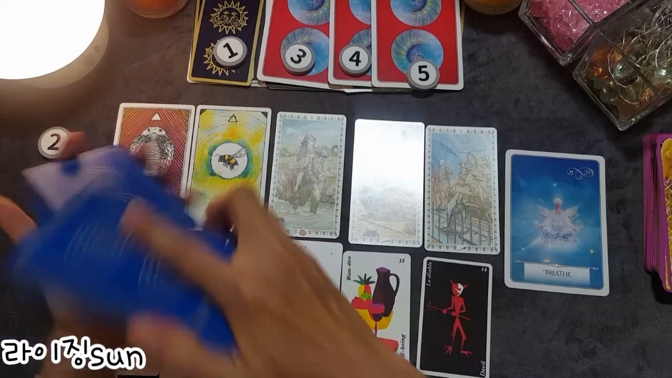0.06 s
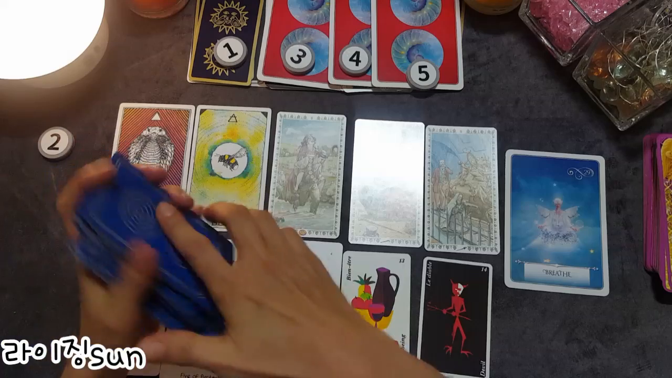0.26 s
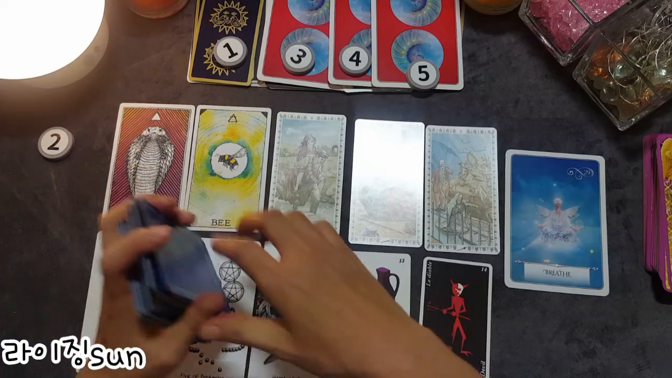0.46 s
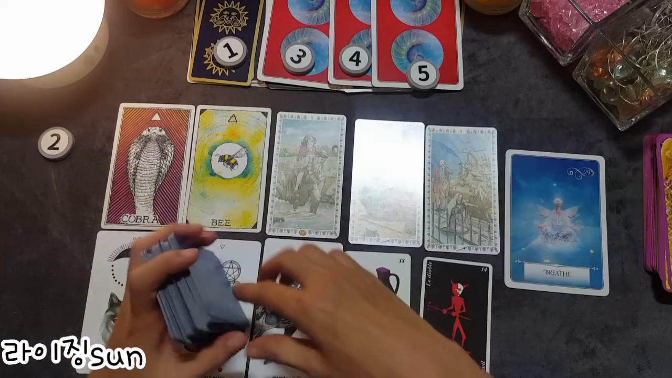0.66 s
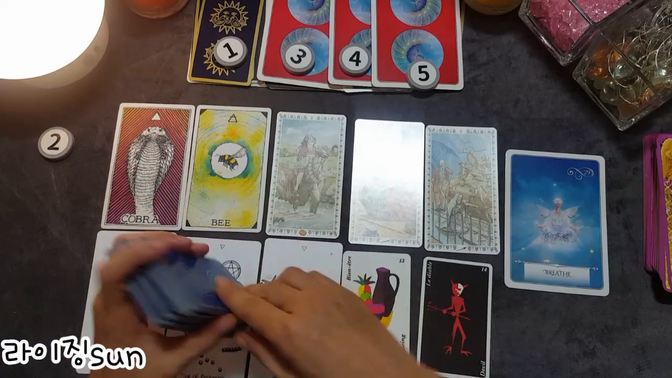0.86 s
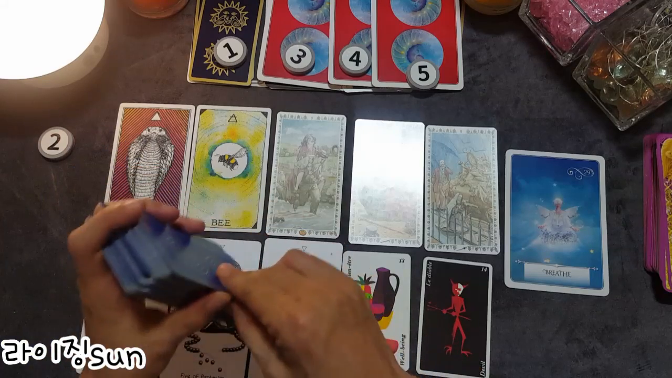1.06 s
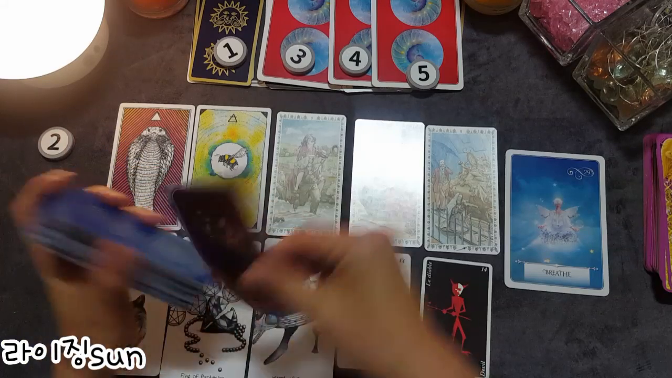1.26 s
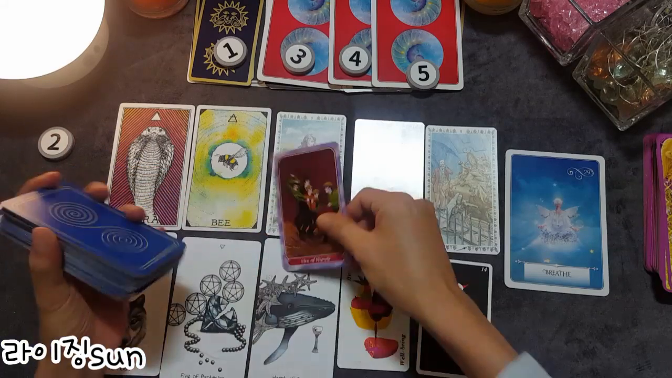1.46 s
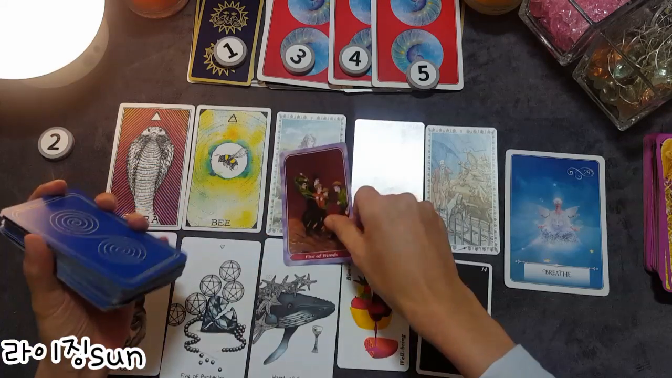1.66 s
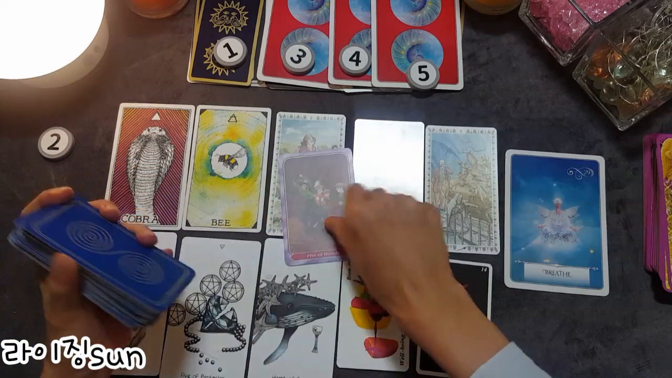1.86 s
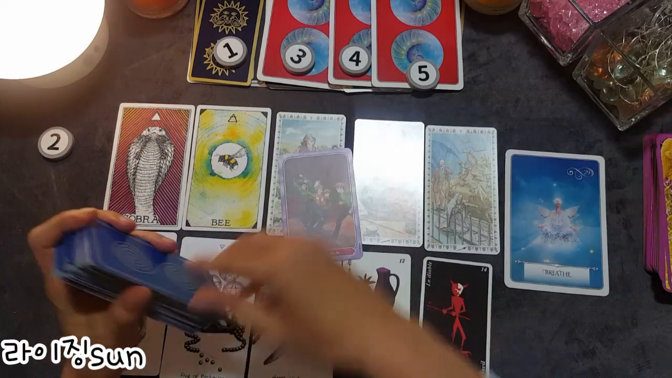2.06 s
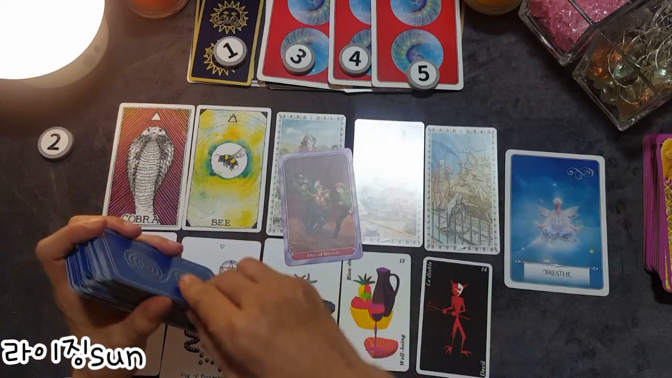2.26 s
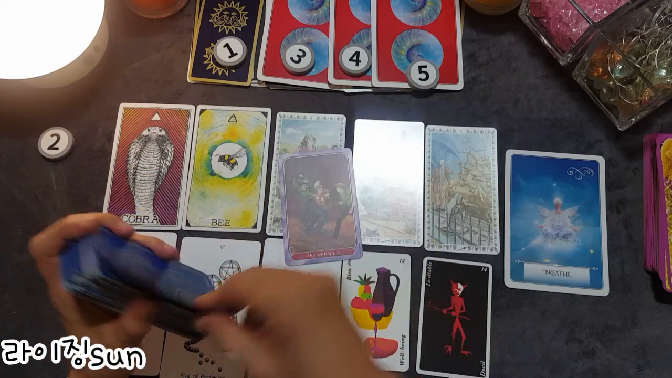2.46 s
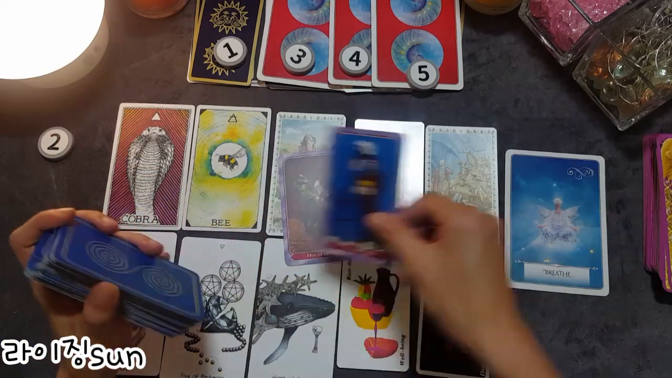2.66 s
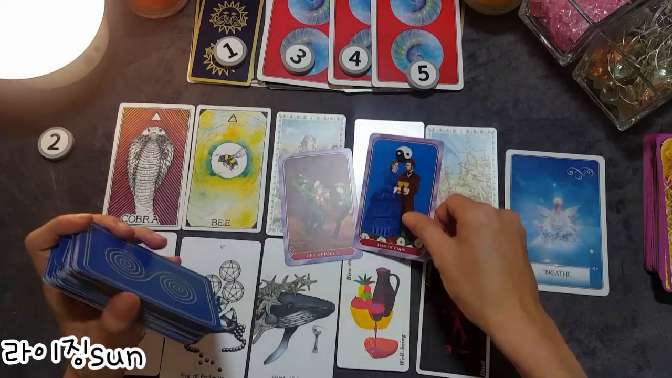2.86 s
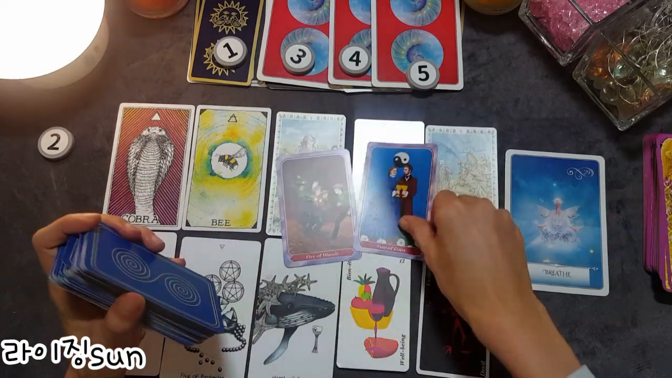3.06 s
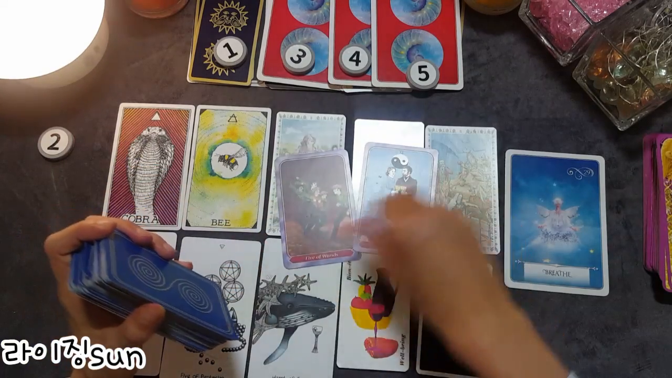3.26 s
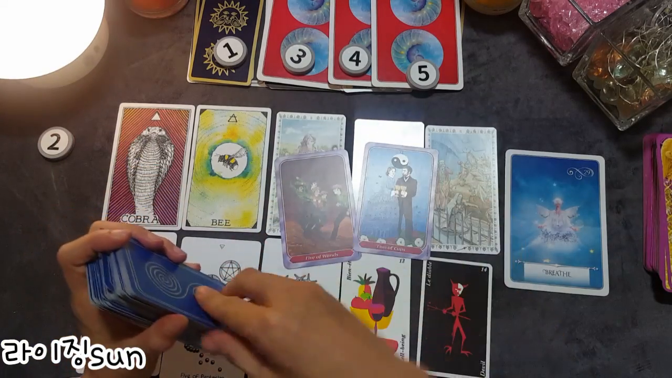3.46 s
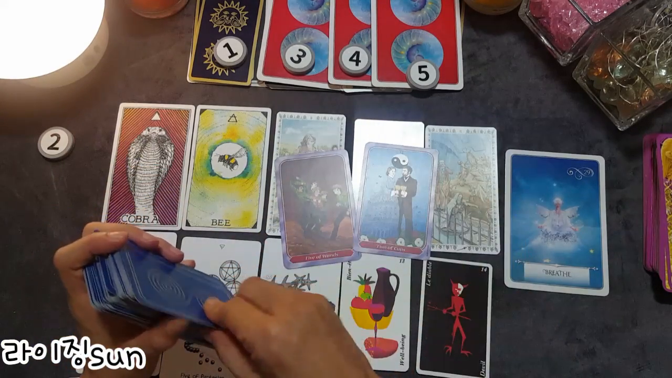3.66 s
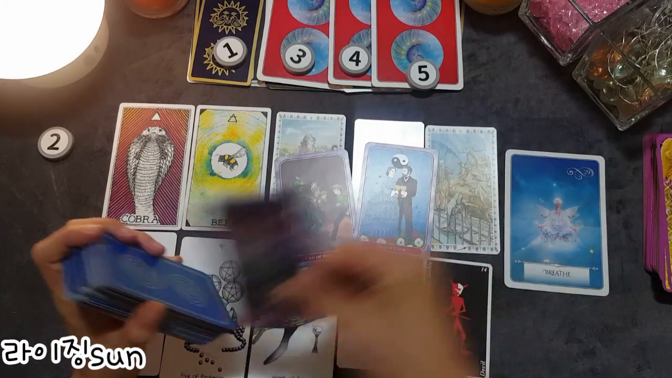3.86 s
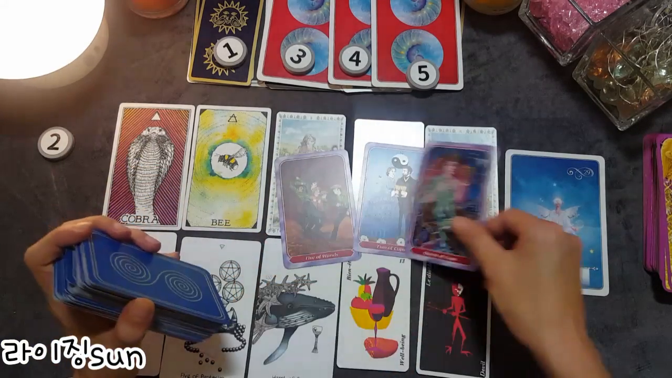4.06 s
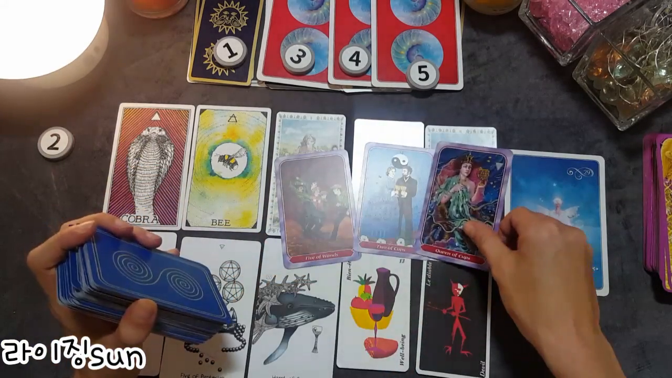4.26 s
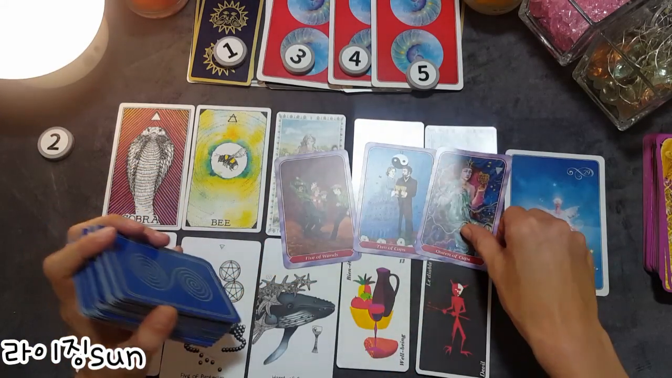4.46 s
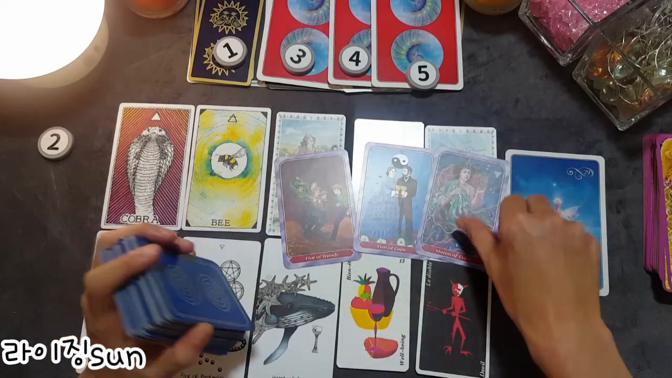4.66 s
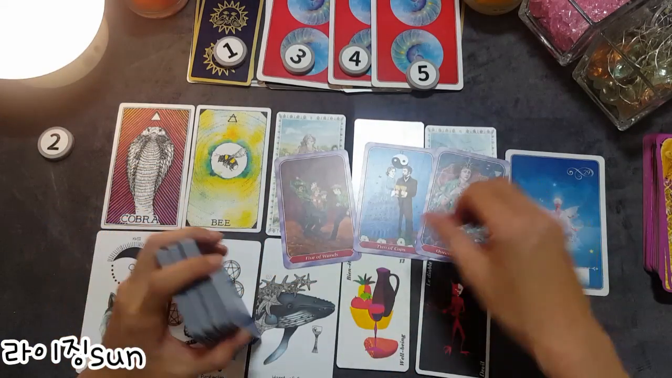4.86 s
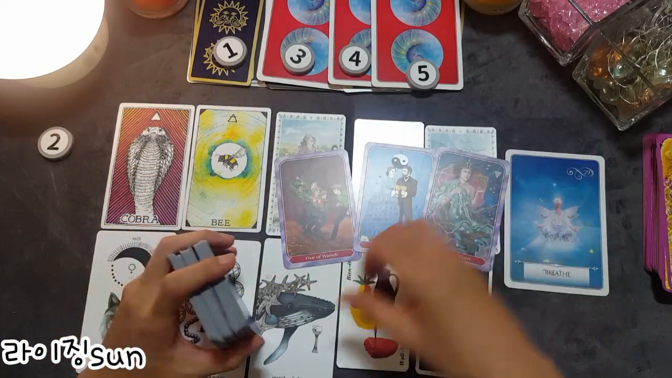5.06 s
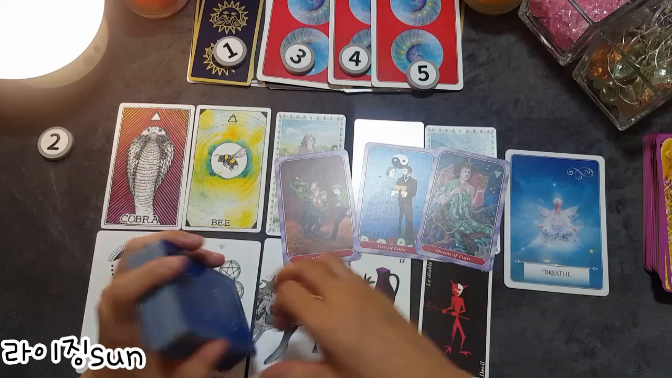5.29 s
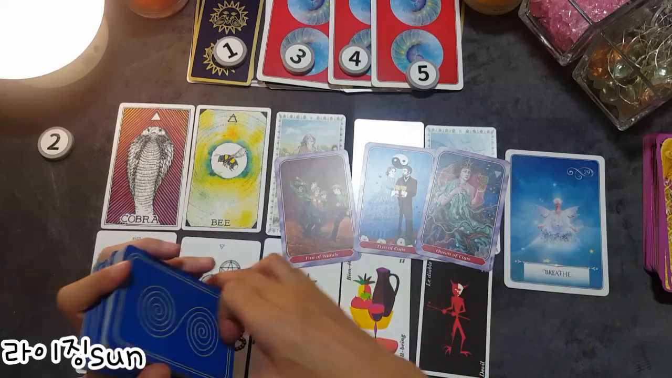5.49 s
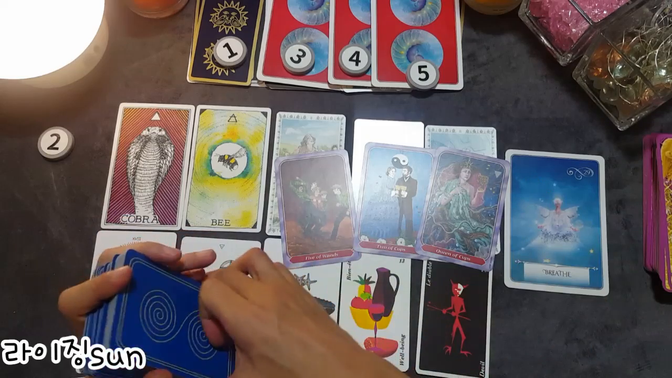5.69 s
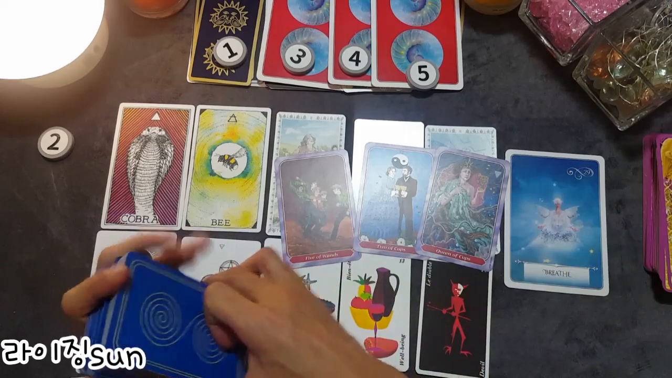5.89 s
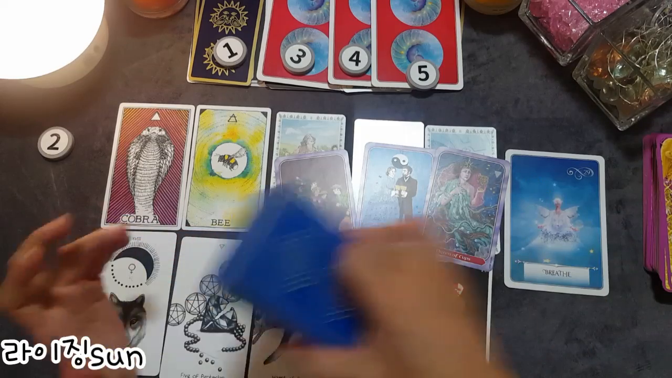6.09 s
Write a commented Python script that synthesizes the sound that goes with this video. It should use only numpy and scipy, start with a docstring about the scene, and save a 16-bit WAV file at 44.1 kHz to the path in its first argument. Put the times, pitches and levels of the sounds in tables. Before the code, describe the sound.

Close card handling: hissing slides, a sharp clap, a fluttering rush, three rasping draws each ending in a crisp snap, then more soft knocks.

```python
"""Close stereo of a card deck on a cloth-covered table in a small room, over air noise and a faint hum.
A card slides, then the stiff deck is clapped shut, knocked square, bounced, and settles in a rush of cards.
Three cards are drawn in turn, dragged over the thumb and snapped down; the deck is knocked again, a finger squeaks.
Ticks, taps and rustle run between. Contacts are shaped noise or impulses through resonances, rubbing is grainy
coloured noise; resonances of room and table ring after a push and the walls answer with a decaying noise tail."""
import sys
import numpy as np
from scipy import signal
from scipy.fft import rfft, irfft, next_fast_len
from scipy.io import wavfile
from scipy.ndimage import uniform_filter1d

SR = 44100
rng = np.random.default_rng(int(sys.argv[2]) if len(sys.argv) > 2 else 0)


def persist_wave(psi):
    """Save psi, clipped to +-1, as 16-bit WAV."""
    counts = np.round(np.clip(psi, -1, 1) * 32767).astype(np.int16)
    wavfile.write(sys.argv[1], SR, np.atleast_2d(counts).T)


N = 270333
TIME = np.arange(N) / SR

# left-right likeness of sound straight from the hands: f/Hz, likeness/0-1
NEAR_LIKENESS = [(500, 0.88), (1400, 0.69), (3000, 0), (6000, 0)]
# left-right likeness of the room's reflections and air noise: f/Hz, likeness/0-1
ROOM_LIKENESS = [(60, 0.92), (150, 0.92), (300, 0.72), (640, 0.38), (1400, 0), (4000, 0), (15000, 0)]
# colour of a card or skin rasping: f/Hz, level/dB
RASP_COLOUR = [(200, -17.5), (600, 0.5), (1100, 3.5), (2400, 2), (4500, -6), (7000, -4.5), (14000, -30)]
# dealt cards snapping down: t/s, level/dB, drag length/s, drag gain/dB, spread of the snap/s,
# card pitch f/Hz, card ring/dB, thud/dB
RELEASES = [(1.9138, -6.5, 0.055, -45, 0.0015, 4300, 5, -10.5),
            (3.2281, -3.5, 0.074, -44.5, 0.0027, 850, 8, -20.5),
            (4.6501, -5.5, .128, -42.5, 0.0038, 740, -9, -21)]


def from_db(db):
    """Decibels to gain."""
    return 10 ** (np.asarray(db) / 20)


def rms_one(x):
    """Scale to rms 1."""
    return x / np.sqrt(np.mean(x ** 2) + 1e-20)


def at_hz(points, hz):
    """Read a table on a log-frequency axis."""
    f, value = np.transpose(points)
    return np.interp(np.log(np.maximum(hz, 1)), np.log(f), value)


def cut(x, hz, kind, order=2):
    """Butterworth filter: keep what lies below or above a cut-off."""
    sos = signal.butter(order, np.clip(hz, 10, SR / 2 - 500), kind, fs=SR, output="sos")
    return signal.sosfilt(sos, x + 1e-18)


def resonate(x, hz, width):
    """One damped resonance, width in Hz, with a gain of about 1 at its peak."""
    r = np.exp(-np.pi * width / SR)
    feed = np.array([1, 0, -1]) * (1 - r * r) / 2
    return signal.lfilter(feed, [1, -2 * r * np.cos(2 * np.pi * hz / SR), r * r], x + 1e-18)


def colour(x, spectrum):
    """Give a noise a spectrum."""
    size = next_fast_len(x.shape[-1])
    gain = from_db(at_hz(spectrum, np.fft.rfftfreq(size, 1 / SR)))
    return irfft(rfft(x, size) * gain, size)[..., :x.shape[-1]]


def stereo_noise(size, likeness):
    """White noise whose left-right likeness follows a table over frequency; rms 1."""
    padded = next_fast_len(size)
    mid, side = rfft(rng.standard_normal((2, padded)))
    alike = np.clip(at_hz(likeness, np.fft.rfftfreq(padded, 1 / SR)), -1, 1)
    both = np.sqrt(1 + alike) * mid + np.sqrt(1 - alike) * np.array([side, -side])
    return rms_one(irfft(both, padded)[:, :size])


def drift(rate, size=N):
    """Random points of spread 1, rate of them per second, joined by straight lines."""
    knots = np.arange(0, size / SR + 1, 1 / rate)
    return np.interp(TIME[:size], knots, rng.standard_normal(len(knots)))


def add(out, s, sound, pan_db=0):
    """Mix a sound in at time s; pan_db is left over right."""
    start = max(round(s * SR), 0)
    placed = sound * from_db([[pan_db / 2], [-pan_db / 2]])
    out[:, start:start + sound.shape[-1]] += placed[..., :N - start]


def track(sounds):
    """Lay (s, level dB, L-R dB, sound) on one track, each sound centred on its time."""
    out = np.zeros((2, N))
    for s, level_db, pan_db, sound in sounds:
        add(out, s - sound.shape[-1] / SR / 2, from_db(level_db) * sound, pan_db)
    return out


def contact(swell, fade, grain_db, size=8192):
    """Tiny touches crowd, in clumps, toward mid-window and thin out after it; energy 1 a side."""
    t = (np.arange(size) - size // 2) / SR
    envelope = np.exp(-np.maximum(-t / max(swell, 1e-5), t / max(fade, 1e-5)))
    grains = from_db(grain_db * (rng.standard_normal(size) + .6 * drift(900, size)))
    spectrum = rfft(stereo_noise(size, NEAR_LIKENESS) * envelope * grains)
    # even out the burst's spectrum, so that every contact has a steady tone colour
    smooth_power = uniform_filter1d(np.abs(spectrum) ** 2, size=60)
    touches = irfft(spectrum / np.sqrt(smooth_power + 1e-12)) * envelope ** .15
    return touches / np.sqrt(np.sum(touches ** 2, axis=1, keepdims=True))


def snap(swell, fade, hz, ring_db, crack_db, treble_db, body_hz=4100, edge_hz=5300, top_hz=13500,
         card_q=2.04, low_hz=120, crack_hz=2900, crack_width=900):
    """A card slaps down: woody body, the card's short ring, the crack of stiff stock and a crisp top."""
    force = contact(swell, fade, grain_db=3.0)
    body = cut(cut(force, body_hz, "low", order=3), low_hz, "high", order=1)
    ring = from_db(ring_db) * resonate(resonate(body, hz, hz / card_q), hz, hz / card_q)
    crack = from_db(crack_db) * resonate(body, crack_hz, crack_width)
    edge = from_db(treble_db) * cut(cut(force, edge_hz, "high", order=4), top_hz, "low")
    return body + ring + crack + edge * from_db([[-1.2], [1.0]])  # left, right


def friction(spectrum, grain_db):
    """Card fibres catch and slip in fine grains, and the whole stroke judders; rms 1."""
    judder = from_db(2.7 * drift(300))
    slips = stereo_noise(N, NEAR_LIKENESS) * judder * from_db(grain_db * drift(4000))
    return rms_one(colour(slips, spectrum))


def stroke(start, end, rise_db_per_s, sag_db_per_s=0, stop_db_per_s=1995):
    """A gain that rises to 1 at the start, sags from then on and stops quickly after the end."""
    early, since, late = np.maximum([start - TIME, TIME - start, TIME - end], 0)
    loss_db = rise_db_per_s * early + sag_db_per_s * since + stop_db_per_s * late
    return from_db(-np.minimum(loss_db, 200))


def ring_modes(push):
    """Low and mid resonances of room and table ring after a push."""
    # resonances: f/Hz, width/Hz, level/dB
    resonances = [(148.6, 5.4, 15), (213.6, 7.6, 14.5), (227.9, 11, 20), (263, 14, -13), (377, 6.1, 16.5),
                  (485, 7.4, 10), (642.2, 7.4, 15), (953, 12, 11.5), (1153, 12, -7), (1350, 14.5, -8),
                  (1414, 6.9, 12.5), (1996, 10, 18.5), (2115, 15, 22)]
    return sum(from_db(db) * resonate(push, hz, width) for hz, width, db in resonances)


def background(waver=1.0, air_db=-62.21):
    """Steady air noise fills the room under faint appliance tones that waver in phase."""
    # colour of the air noise: f/Hz, level/dB
    air_colour = [(12, -40), (20, -23), (53, -12.5), (134, -1), (198, -9), (399, -10.5), (642, -16),
                  (718, -13.5), (976, -20.5), (1370, -21), (1810, -26.5), (2390, -27), (6720, -38),
                  (13900, -36), (16000, -34.5)]
    # appliance tones: f/Hz, level/dB
    hum_tones = [(54, -77.5), (119, -73), (258, -77), (13790, -90)]
    air = from_db(air_db) * rms_one(colour(stereo_noise(N, ROOM_LIKENESS), air_colour))
    hum = 0
    for hz, db in hum_tones:
        phase = 2 * np.pi * hz * TIME + waver * drift(8)
        hum = hum + from_db(db) * np.sqrt(2) * np.sin(phase)
    return air + hum


def rustle(level_db=-80, swing_db=5, swings_per_s=22):
    """Fingers shift on the deck all the while: skin rubs faintly, coming and going."""
    return from_db(level_db + swing_db * drift(swings_per_s)) * friction(RASP_COLOUR, grain_db=3.0)


def slides():
    """A card creeps under the finger, runs free with a hiss, slows, and flicks off the edge of the deck."""
    # cards running free over the deck: t/s, hiss/dB, slowing/(dB per s), time to the end flick/s, flick/dB
    slide_list = [(0.002, -52.5, 62, 0.022, -81), (0.84, -62, 103.5, 0.044, -71),
                  (1.309, -49, 70, 0.044, -61), (2.572, -47.5, 520, 0.0646, -53.5),
                  (3.892, -44, 500, 0.0635, -54), (5.27, -65.5, 700, 0.055, -76)]
    # colour of the hiss: f/Hz, level/dB
    hiss_colour = [(1500, -20), (5000, -8), (8500, -13.5), (11000, -4.5), (14000, -11), (16000, -8.5)]
    creep_s, creep_db, creep_rise_db_per_s = 0.2, -20.5, 56  # creep level is against the free run
    break_db_per_s, flick_db_per_s = 1400, 900  # how fast the run starts and the flick swells
    # the rasp builds after the hiss, as the card bends over the edge
    rasp_lag_s, rasp_rise_db_per_s, rasp_sag_db_per_s = 0.018, 330, 105
    rasp_creep_db, rasp_run_db = -18, -10  # against the peak hiss
    hiss, rasp = np.zeros((2, N))
    for s, hiss_db, slowing_db_per_s, run_s, flick_db in slide_list:
        end = s + run_s
        creep = stroke(s, s, creep_rise_db_per_s) * (TIME > s - creep_s)
        run = stroke(s, end, break_db_per_s, slowing_db_per_s)
        bend = stroke(s + rasp_lag_s, end, rasp_rise_db_per_s, rasp_sag_db_per_s)
        hiss += from_db(hiss_db) * (from_db(creep_db) * creep + run)
        hiss += from_db(flick_db) * stroke(end, end, flick_db_per_s)
        rasp += from_db(hiss_db) * np.maximum(from_db(rasp_creep_db) * creep, from_db(rasp_run_db) * bend)
    hissing = hiss * friction(hiss_colour, grain_db=2.0) * from_db([[-1.5], [0.3]])  # left, right
    return hissing + rasp * friction(RASP_COLOUR, grain_db=5.0)


def room(x, first_echo_s=0.00064, build_s=0.00047):
    """Dense reflections from near walls, each octave dying at its own rate."""
    # decay of the room: f/Hz, time to fall 60 dB/s
    decay_times = [(100, 0.9), (260, 0.35), (700, 0.33), (1400, 0.32), (2500, 0.33), (4850, 0.37),
                   (12800, 0.25)]
    # colour of the reflections: f/Hz, level/dB
    wall_colour = [(50, -7), (150, -6.5), (400, 1), (800, -1), (1400, -4), (2100, -2), (4000, -5.5),
                   (7000, -6), (11000, -4), (16000, -6)]
    t = TIME[:SR * 3 // 4]
    noise = rfft(colour(stereo_noise(len(t), ROOM_LIKENESS), wall_colour))
    hz = np.fft.rfftfreq(len(t), 1 / SR)
    centres, tail = np.geomspace(60, 15360, 9), 0
    for centre, share in zip(centres, np.eye(len(centres))):
        decay = from_db(-60 * t / at_hz(decay_times, centre))
        decay = decay * (1 - np.exp(-np.maximum(t - first_echo_s, 0) / build_s))
        octave = irfft(noise * at_hz(np.c_[centres, share], hz), len(t))
        tail = tail + octave * decay / np.linalg.norm(decay)
    return signal.fftconvolve(x, tail, axes=1)[:, :N]


def taps(tap_q=1.2, pad_hz=1300, ring_db=-12, stack_hz=245, stack_width=45, stack_db=9, count=3):
    """A soft fingertip makes short damped swings; the cards flutter and low resonances ring."""
    # fingertips landing on cards: t/s, peak level of the first swing/dB, f/Hz
    tap_list = [(0.17, -44.5, 516), (2.015, -45, 470), (2.266, -44, 460), (2.323, -49, 507),
                (2.441, -46.5, 487), (2.558, -44.5, 477), (2.598, -45.5, 473), (2.833, -37.5, 493),
                (3.427, -42, 480), (3.834, -40, 1060), (3.989, -48, 430), (4.173, -38, 620)]
    # each tap starts a moment after its listed time and pats again, softer
    tap_delay_s, rebound_s, rebound_loss_db = 0.00279, 0.00404, 8.5
    out = np.zeros((2, N))
    for s, peak_db, hz in tap_list:
        tap = cut(resonate(signal.unit_impulse(2048), hz, hz / tap_q), pad_hz, "low")
        tap = tap / np.abs(tap).max()
        for k, uneven in enumerate(rng.uniform(0.766, 1.26, count)):
            start_s = s + tap_delay_s + k * uneven * rebound_s
            add(out, start_s, from_db(peak_db - k * rebound_loss_db) * tap)
    flutter = from_db(stack_db) * resonate(out, stack_hz, stack_width)
    return out + flutter + from_db(ring_db) * ring_modes(cut(out, 500, "low", order=1))


def claps():
    """Cards clap together or on the table, air pops from the closing deck, a drawn card's end flaps."""
    # claps: t/s, level/dB, swell/s, fade/s, pitch f/Hz, ring/dB, crack/dB, treble/dB
    clap_list = [(0.2339, -3, 0.00037, 0.0011, 780, 13, -4, 1.5),
                 (0.2388, -14.5, .0016, .0009, 1377, 28, -11, -15),
                 (0.6013, -9.5, 0.00016, 0.0011, 1310, -16, -3.5, -13.5),
                 (1.384, -16.5, 0.013, 0.0021, 1020, 1, -1.5, -10),
                 (1.5629, -16, 0.00011, .0021, 1460, 2, 5.5, -9.5),
                 (4.9422, -10, 0.00013, 0.0067, 1120, 6, -6.5, -17.5),
                 (5.1354, -26.5, 0.00022, .0012, 910, 7, 1, -29)]
    return track((s, level_db, 0, snap(*touch)) for s, level_db, *touch in clap_list)


def knocks(thud_low_hz=66, card_hz=594, card_ring_db=2.0, count=3):
    """Knocks, bounces and dealt cards push through the cloth: returns the thuds and the ringing after."""
    # deck or hand meeting the table: t/s, level/dB, contact cut-off f/Hz, ring/dB
    knock_list = [(0.235, 2, 670, -12), (0.603, -9, 580, 5), (0.701, 7, 390, -2), (0.716, 0, 1420, 8),
                  (1.561, -13, 150, -12), (4.556, 4.5, 185, -29), (4.944, 9.5, 238, -8),
                  (5.112, -14.5, 260, -5), (5.141, -13.5, 310, -1.5), (5.44, -13.5, 199, -14)]
    # before it settles the deck bounces on the table
    bounce_s, gap_s, bounce_db, bounce_hz, bounce_ring_db = 0.6165, .0267, -3, 520, 2
    bounces = [(bounce_s + k * gap_s, bounce_db, bounce_hz, bounce_ring_db) for k in range(count)]
    dealt = [(s, thud_db, card_hz, card_ring_db) for s, *_, thud_db in RELEASES]
    thuds, rings = np.zeros((2, 2, N))
    for s, level_db, contact_hz, ring_db in knock_list + bounces + dealt:
        cushioned = cut(signal.unit_impulse(SR // 2), contact_hz, "low", order=3)
        push = from_db(level_db) * cut(cushioned, thud_low_hz, "high")
        add(thuds, s, push)
        add(rings, s, from_db(ring_db) * ring_modes(push))
    return thuds, rings


def settling(peak_s=0.722, rush_db=2, swell_s=0.021, fade_s=0.022):
    """The loosened deck settles on its edge: a rush of single cards, a few packets standing out."""
    # whole packets landing within the rush: t/s, level/dB, left over right/dB
    packet_list = [(0.7144, -2.5, 1.5), (0.722, -4, 1), (0.7358, -3.5, 4.5)]
    rush = snap(swell_s, fade_s, hz=1000, ring_db=6.5, crack_db=-30, treble_db=-14.5)
    sounds = [(peak_s, rush_db, -1, rush)]
    for s, level_db, pan_db in packet_list:
        packet = snap(swell=0.00097, fade=0.0014, hz=1330, ring_db=3.5, crack_db=-33, treble_db=-10.0)
        sounds.append((s, level_db, pan_db, packet))
    return track(sounds)


def ticks(tick_hz=2080, tick_q=0.9, stock_hz=1500, stock_db=-3):
    """Nails and card edges tick dryly over the dull note of the stock; fainter ones come at random."""
    # ticks: t/s, 1.3 ms before the tick's centre; level/dB, 2 below the tick's peak
    tick_list = [(s + .0013, peak_db + 2) for s, peak_db in [(1.2176, -49), (1.2471, -47), (1.7085, -53.5),
                                                             (2.488, -45), (2.5155, -42), (2.797, -55),
                                                             (2.8509, -41), (3.68, -50), (3.707, -48),
                                                             (3.804, -37.5), (3.8337, -42), (4.1165, -49),
                                                             (4.1612, -38.5), (5.5341, -54),
                                                             (5.9898, -52.5)]]
    faint_per_s, faint_db = 3, -53.5
    faint = [(s, faint_db) for s in TIME[rng.random(N) < faint_per_s / SR]]
    sounds = []
    for s, peak_db in tick_list + faint:
        force = contact(swell=0.00054, fade=0.0016, grain_db=2.5)
        stock = from_db(stock_db) * resonate(force, stock_hz, 1100)
        tick = resonate(force, tick_hz, tick_hz / tick_q) + stock
        sounds.append((s, peak_db, 0, tick / np.abs(tick).max()))
    return track(sounds)


def drags(grip_s=0.037, knee_s=0.015, steepness=1):
    """A bent card rasps over the thumb, ever harder as it nears the snap."""
    # colour of the drag: f/Hz, level/dB
    drag_colour = [(300, -6.5), (900, 2), (1600, -4.5), (2800, 3.5), (3700, -14), (7000, -17.5),
                   (14000, -27)]
    pressure = np.zeros(N)
    for s, _, drag_s, drag_db, *_ in RELEASES:
        held = (TIME > s - drag_s) & (TIME < s)
        left_s = s - TIME[held]
        grip = 1 - np.exp((left_s - drag_s) / grip_s)  # the thumb bears down after the catch
        # the drag grows as a power of the time left before the snap
        pressure[held] += from_db(drag_db) * grip * (1 + left_s / knee_s) ** -steepness
    return pressure * friction(drag_colour, grain_db=6.5)


def releases(catch_db=-31.5, slip_lead_s=.0135, slip_db=-15):
    """The thumb catches the edge of a bent card as the drag begins; it slips once, then snaps down."""
    sounds = []
    for s, level_db, drag_s, _, spread_s, hz, ring_db, _ in RELEASES:
        catch = snap(swell=0.00034, fade=0.0012, hz=2240, ring_db=11.5, crack_db=-16, treble_db=-11)
        slip = snap(swell=.001, fade=0.0078, hz=2370, ring_db=1, crack_db=-2, treble_db=-18)
        slap = snap(spread_s, spread_s, hz, ring_db, crack_db=1, treble_db=-10)
        sounds.append((s - drag_s, catch_db, 1, catch))
        sounds.append((s - slip_lead_s, level_db + slip_db, 0, slip))  # slip level is against the snap
        sounds.append((s, level_db, .5, slap))
    return track(sounds)


def squeak(s=5.393, level_db=-40.5):
    """A finger slips on the deck: skin rubs briefly on a glossy card."""
    slip = snap(swell=.004, fade=0.0032, hz=2520, ring_db=15, crack_db=-15, treble_db=-16)
    return track([(s, level_db, 0, slip)])


def scene():
    """Everything the hands do, heard directly and off the walls, over the ringing and the quiet room."""
    thuds, ringing = knocks()
    rubbing = rustle() + slides() + drags() + squeak()
    cards = rubbing + taps() + claps() + thuds + settling() + ticks() + releases()
    return cards + room(cards) + ringing + background()


def record(dry, port_hz=11200, port_db=-7, cutoff_hz=15400):
    """The microphone ports lift the high treble a little; the top is cut steeply."""
    lifted = dry + from_db(port_db) * resonate(dry, port_hz, 2300)
    return signal.sosfilt(signal.ellip(10, .1, 80, cutoff_hz, fs=SR, output="sos"), lifted)


dry = scene()
out = record(dry)
persist_wave(out)
```